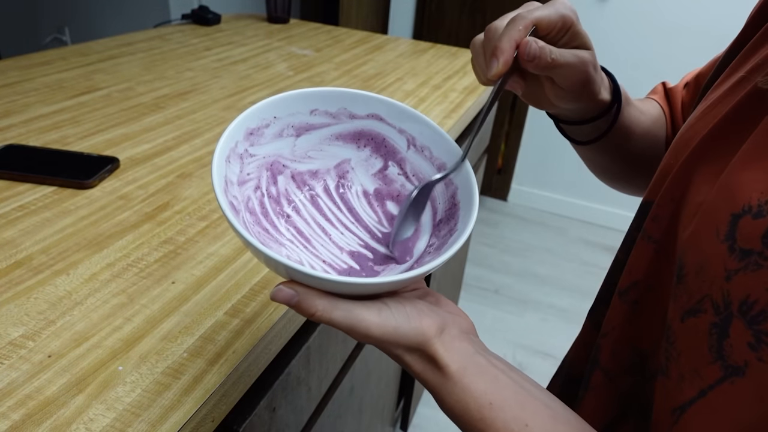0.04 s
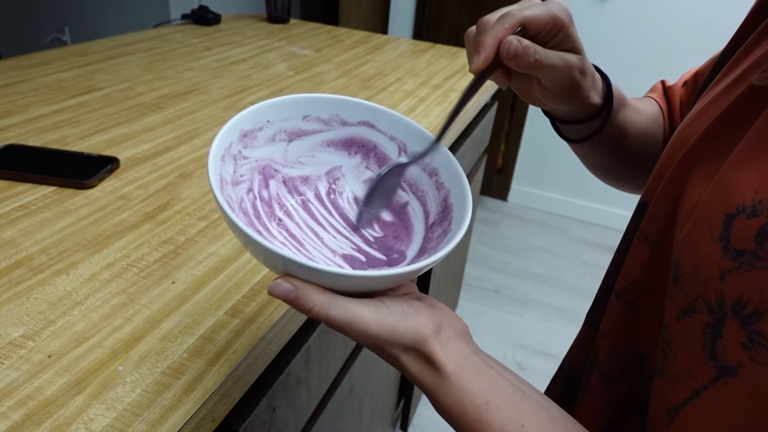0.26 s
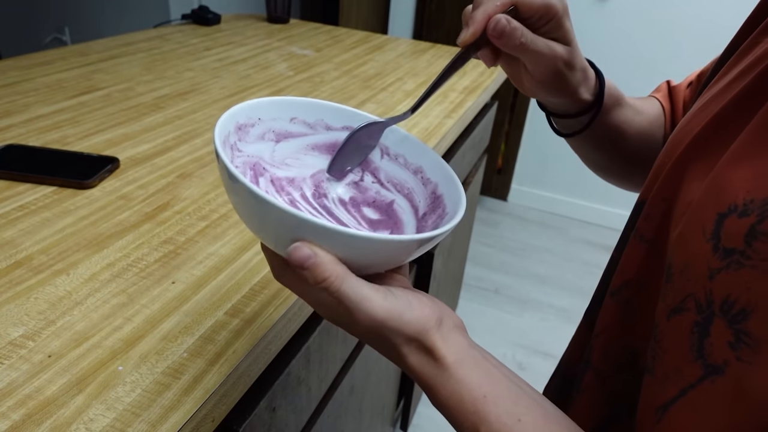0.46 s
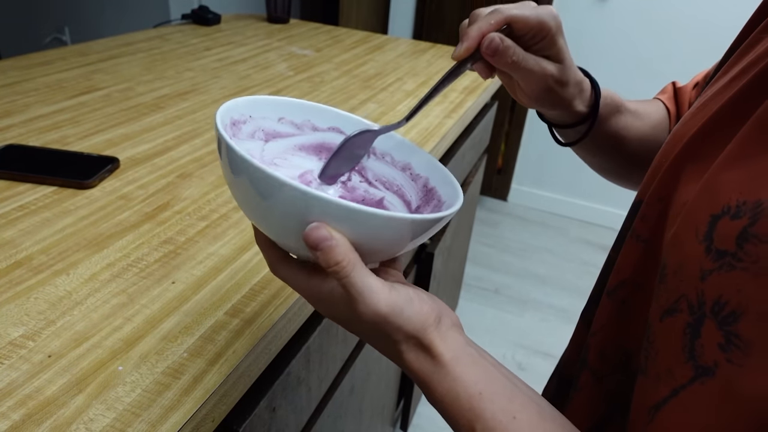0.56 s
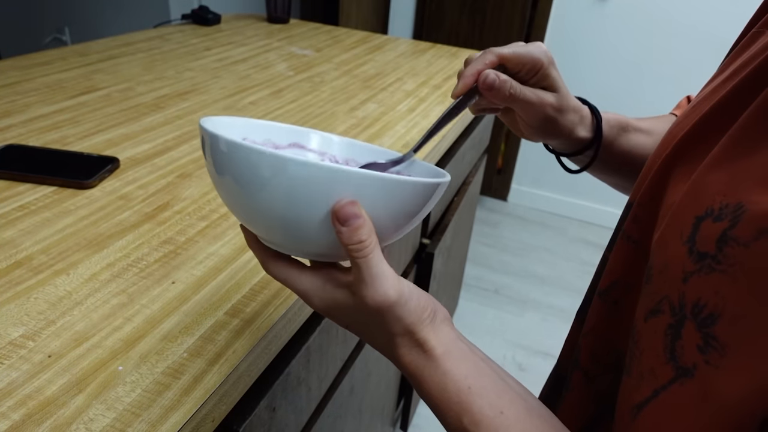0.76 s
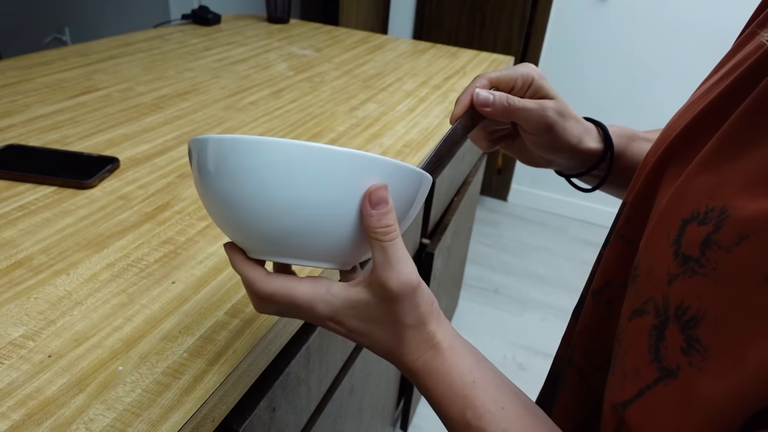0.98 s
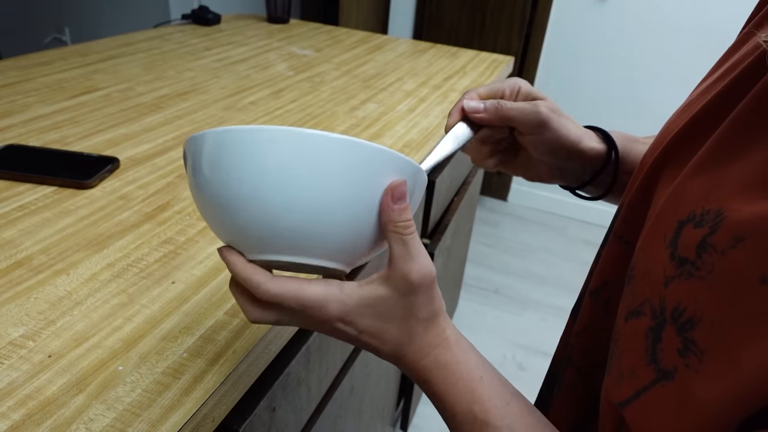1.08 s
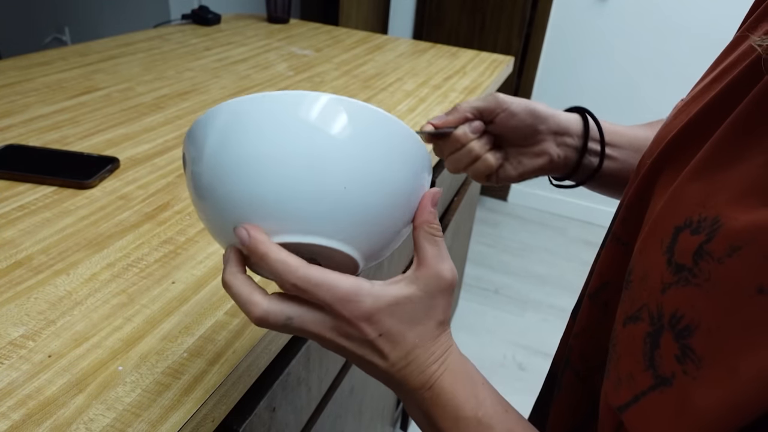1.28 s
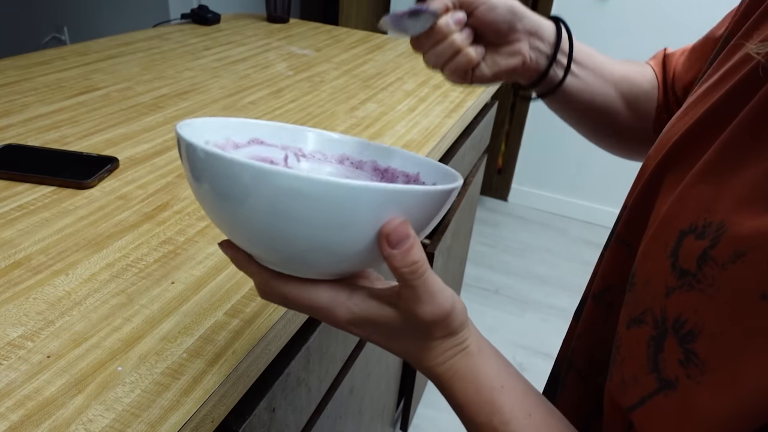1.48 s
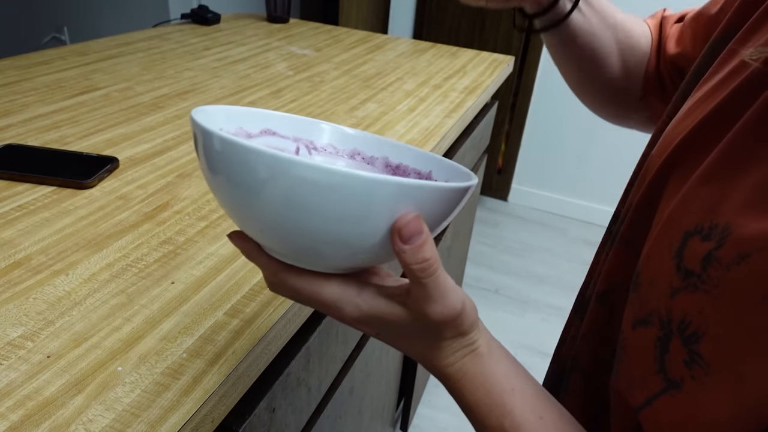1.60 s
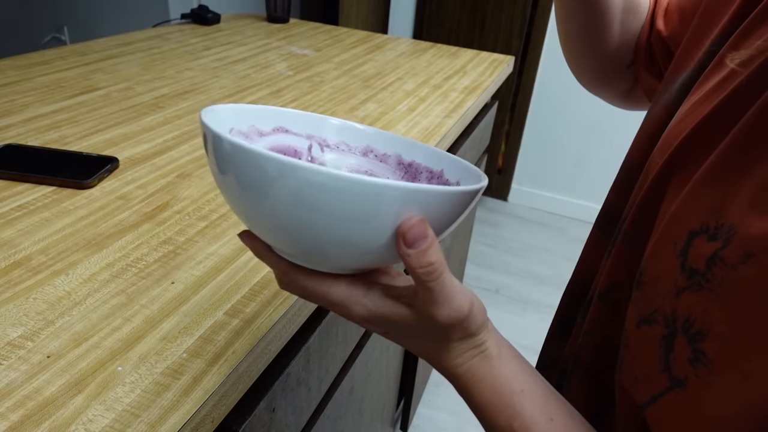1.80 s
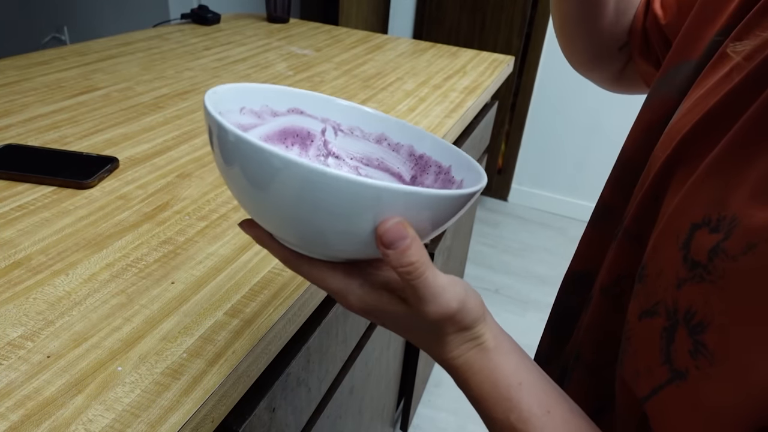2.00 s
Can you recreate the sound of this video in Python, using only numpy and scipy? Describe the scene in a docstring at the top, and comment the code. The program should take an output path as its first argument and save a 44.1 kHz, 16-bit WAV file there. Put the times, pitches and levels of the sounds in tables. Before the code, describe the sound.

A metal spoon scrapes and clinks three times against a hand-held ceramic bowl, ringing briefly. A soft wipe through a creamy film follows, with small wet ticks and a final dry click, heard close in a small, quiet kitchen.

```python
"""In a small, quiet kitchen a metal spoon scrapes a hand-held ceramic bowl and clinks against it three
times, each impact exciting the bowl's normal modes. Stick-slip friction makes the scrapes and squeaks.
A dull knock sounds as the spoon begins a soft wipe along the wall; before and after it the creamy film
snaps in small wet ticks, and a dry click ends the scene. The room reverberates after each clink,
over the faint hum of an appliance."""
import sys
import numpy as np
from scipy import signal
from scipy.fft import rfft, irfft
from scipy.io import wavfile

SR = 44100
rng = np.random.default_rng(int(sys.argv[2]) if len(sys.argv) > 2 else 0)


def pcm_store(signal):
    """Save signal as 16-bit PCM."""
    levels = np.round(np.clip(np.atleast_2d(signal), -1, 1) * 32767)
    wavfile.write(sys.argv[1], SR, levels.astype(np.int16).T)


N = 90404
TIME = np.arange(N) / SR
FREQS = np.fft.rfftfreq(N, 1 / SR)


def clinks():
    """Impact excitation: a crack, a dense clack and free modal vibration, which the spoon later damps."""
    # blows (time [s], clack level [dB], clack t60 [s], clack tilt [dB/octave], time until damped [s])
    blows = [(.2364, -20, 0.048, -0.7, 0.24), (.2996, -26, 0.054, -0.25, 0.18),
             (.5538, -27.5, 0.15, 1, .45)]
    # normal modes of the bowl; the lowest form close pairs that beat (frequency [Hz])
    mode_hz = [980, 986, 2309, 2298, 2936, 3770, 4003, 4024, 5170, 5545, 5594, 6061, 6765, 6793, 7316, 8396,
               8568, 8736, 10190, 10664, 11030, 11720, 12250, 12930, 14850]
    # each contact point excites these modes differently (t60 [s], level in blow 1, 2, 3 [dB])
    mode_response = [(0.83, -58.5, -63.5, -33), (0.19, -18, -50.5, -26.5), (.43, -25, -44.5, -30),
                     (0.11, -25, -63, -25), (.12, -40.5, -61.5, -35.5), (.14, -39, -51.5, -38),
                     (.26, -23, -58.5, -24), (0.17, -30, -48.5, -35), (0.094, -46.5, -32.5, -63.5),
                     (0.21, -35.5, -53.5, -32.5), (0.074, -40, -41.5, -56), (0.15, -22.5, -44.5, -24.5),
                     (.22, -40, -35.5, -52), (0.087, -37.5, -23, -45.5), (.16, -56.5, -57.5, -38.5),
                     (0.12, -20.5, -53, -28.5), (0.22, -36.5, -32, -47.5), (.19, -41.5, -31, -47.5),
                     (.12, -47.5, -42.5, -28), (0.051, -49, -34, -20), (.13, -50.5, -50, -42),
                     (.12, -35, -52, -31.5), (.12, -46, -55, -38), (.13, -48, -53, -48),
                     (.12, -39, -44, -70.5)]
    # spectrum of metal striking glaze (frequency [Hz], relative level [dB])
    clack_spectrum = [(60, -30.5), (250, -11.5), (500, -3), (750, -1.5), (1100, 0), (1550, -6.5),
                      (2300, -8.5), (3100, -11), (4200, 1.5), (5300, -5.5), (6400, 4.5), (7600, -10.5),
                      (8700, -4.5), (9600, -6.5), (12000, -8.5), (13600, -8), (15100, -9.5), (16000, -15)]
    pairs_below_hz, pressed_t60_s = 2500, 0.13
    crack_db, crack_t60_s, rise_s = 11, 0.0089, 0.00027
    peak_width_hz, peak_db = 71, 6  # the clack gathers around the modes
    clack_colour = read(clack_spectrum, FREQS) + resonances([(hz, peak_width_hz, peak_db) for hz in mode_hz])
    out = np.zeros(N)
    for k, (s, clack_db, clack_t60, tilt_db, free_s) in enumerate(blows):
        signs = np.where(np.array(mode_hz) < pairs_below_hz, 1, rng.choice([-1, 1], len(mode_hz)))
        modes = sum(sign * ring(hz, levels[k], t60)
                    for sign, hz, (t60, *levels) in zip(signs, mode_hz, mode_response))
        damping = decay(np.maximum(TIME - free_s, 0), pressed_t60_s)
        envelope = decay(TIME, clack_t60) + amp(crack_db) * decay(TIME, crack_t60_s)
        clack = colour(rng.standard_normal(N) * envelope, clack_colour + tilt_db * np.log2(FREQS + 20))
        add(out, s, modes * rise(rise_s) * damping + amp(clack_db) * clack)
    return out


def scrapes():
    """Forced vibration: hard strokes along the glaze drive the resonances of spoon and bowl."""
    # strokes of the spoon (time [s], duration [s], level [dB])
    strokes = [(0, 0.018, -44), (0.015, 0.075, -45.5), (0.345, 0.051, -49), (0.734, 0.051, -59.5),
               (0.821, 0.053, -67)]
    # friction spectrum of the glaze (frequency [Hz], relative level [dB])
    grit = [(150, -26), (450, -10), (640, -3.5), (820, -13.5), (1200, 0), (1900, -11.5), (4400, -9),
            (5500, -6.5), (9000, -10), (11000, -12.5), (13500, -27.5), (15200, -19.5)]
    # resonances of spoon and bowl in contact (frequency [Hz], bandwidth [Hz], relative level [dB])
    contact = [(640, 130, 8), (974, 30, 11.5), (2305, 28, 13.5), (3923, 70, 16.5), (4400, 130, 8.5),
               (5300, 34, 0.5), (6000, 150, 3.5), (6800, 91, 15.5), (8900, 85, 15), (10120, 210, 11.5),
               (10050, 150, 11), (13000, 74, 15), (14950, 250, 6)]
    edge_s = 0.0075
    pressure = sum(amp(db) * np.clip(np.minimum(TIME - s, s + length - TIME) / edge_s + 0.5, 0, 1)
                   for s, length, db in strokes)
    return friction(pressure, read(grit, FREQS) + resonances(contact))


def wipe():
    """Lubricated friction: the spoon slides softly up the creamy wall."""
    # envelope of the wipe (time [s], level [dB])
    envelope = [(0.878, -69), (1.002, -74.5), (1.08, -69), (1.19, -64.5), (1.24, -57.5), (1.291, -62.5),
                (1.36, -68.5), (1.55, -108)]
    # friction spectrum of the cream (frequency [Hz], relative level [dB])
    cream = [(300, -16.5), (800, 5), (1100, 15), (1600, -9), (2000, -20), (2320, 4), (2900, -15.5),
             (4500, 0), (6000, -4.5), (7800, -10), (9100, -5), (12000, -28), (16000, -26)]
    s, db = np.transpose(envelope)
    pressure = amp(np.interp(TIME, s, db, left=-np.inf, right=-np.inf))
    return friction(pressure, read(cream, FREQS))


def friction(pressure, spectrum_db):
    """Friction noise: thousands of tiny random slips, as strong as the pressure on the spoon."""
    slips_per_s, spread_db = 4500, 2.5
    strengths = rng.standard_normal(N) * amp(-spread_db * rng.standard_normal(N))
    slips = strengths * (rng.random(N) < slips_per_s / SR)
    return colour(unit(slips) * pressure, spectrum_db)


def squeaks():
    """Stick-slip oscillation: the slips lock into a short, unsteady tone."""
    # gliding tones (time [s], duration [s], start frequency [Hz], end frequency [Hz], level [dB])
    glides = [(.024, .024, 6850, 6800, -35), (.040, .036, 3940, 3980, -47), (.044, .04, 8900, 8950, -39),
              (.053, .014, 6830, 6850, -31), (.2982, .016, 6790, 6775, -15), (.836, .018, 3300, 3000, -47),
              (.836, .03, 9250, 9050, -60), (1.095, .095, 4150, 4950, -60)]
    wobble_hz, gain_db = 67.6, -0.05
    out = np.zeros(N)
    for s, length, start_hz, end_hz, db in glides:
        progress = np.minimum(TIME / length, 1)
        hz = start_hz + (end_hz - start_hz) * progress + wobble_hz * drift(span_s=0.002)
        tone = np.sin(2 * np.pi * np.cumsum(hz) / SR)
        add(out, s, amp(db + gain_db) * np.sin(np.pi * progress) * tone)
    return out


def ticks():
    """Film rupture: each sticky film snaps with a damped tone and a burst of band-pass noise."""
    # snapping films (time [s], frequency [Hz], level [dB], t60 [s])
    snaps = [(.4750, 9750, -37.5, 0.0048), (0.4793, 8630, -29.5, 0.0037), (0.4815, 5600, -31, 0.01),
             (0.4835, 3150, -36, 0.0066), (.4847, 13500, -44, .004), (0.517, 11500, -42.5, 0.0022),
             (0.8198, 4260, -42, 0.0056), (1.3245, 2270, -35, 0.003), (1.3259, 1410, -35, 0.0054),
             (1.3282, 3780, -31.5, 0.0023), (1.3305, 2630, -40.5, .005), (1.4, 5100, -22.5, 0.0014),
             (1.4012, 8330, -37, 0.0038), (1.4405, 6700, -49.5, 0.011), (1.4448, 4800, -32, 0.0031),
             (1.4613, 6440, -43, 0.0054), (1.4659, 7500, -58, .004), (1.4786, 3890, -32, 0.0055),
             (1.4806, 7000, -49, 0.0065), (1.493, 6800, -45.5, 0.0044), (1.5469, 4000, -56, 0.014)]
    grit_gain = 0.27
    out = np.zeros(N)
    for s, hz, db, t60 in snaps:
        detuning = (FREQS + 20) / hz - hz / (FREQS + 20)
        grit = colour(rng.standard_normal(N) * decay(TIME, t60), -20 * np.log10(1 + detuning ** 2))
        add(out, s, ring(hz, db, t60) * rise(0.0001) + grit_gain * amp(db) * grit)
    return out


def knock():
    """Heavy damping: the hand absorbs the bowl's vibration, so a light blow sounds dull."""
    # blow on the held bowl (time [s], gain [dB])
    blows = [(.9876, -35)]
    # hand-damped modes (frequency [Hz], relative level [dB], t60 [s])
    modes = [(262, -5.5, 0.048), (794, 4.5, 0.006), (1530, -22, 0.0069), (3220, 10.5, 0.0019),
             (5190, -0.5, 0.0051), (7400, -33, 0.0012)]
    return taps(blows, modes, rise_s=0.00008)


def click():
    """Transient vibration: the spoon's modes die quickly in a short, dry click."""
    # tap of the spoon (time [s], gain [dB])
    blows = [(1.9966, -26)]
    # modes of the click (frequency [Hz], relative level [dB], t60 [s])
    modes = [(710, -12, 0.024), (973, -12, 0.031), (1610, -10, 0.011), (2580, -21, 0.028), (4180, 2, 0.013),
             (4430, -13, 0.0099), (6100, -14.5, .006), (8600, -10, 0.0024), (11850, -15, 0.0037)]
    return taps(blows, modes, rise_s=0.00087)


def taps(blows, modes, rise_s):
    """Modal superposition: each light blow is a sum of damped sinusoids."""
    out = np.zeros(N)
    sound = sum(ring(hz, db, t60) for hz, db, t60 in modes) * rise(rise_s)
    for s, db in blows:
        add(out, s, amp(db) * sound)
    return out


def kitchen(x):
    """Reverberation: early reflections from the counter and a diffuse tail, longest in the midrange."""
    # reverberation time of the kitchen (frequency [Hz], t60 [s])
    reverb_times = [(200, .3), (600, 0.14), (1400, 0.66), (4000, 0.55), (9000, 0.37), (15000, 0.22)]
    tail_db, predelay_s = -10.5, 0.004
    early_db, early_t60_s, echoes_per_s = -15, 0.05, 1500
    hz, t, noise_bands = signal.stft(rng.standard_normal(SR), SR, nperseg=256)
    tail = signal.istft(noise_bands * decay(t, read(reverb_times, hz)[:, None]), SR, nperseg=256)[1][:SR]
    early = rng.standard_normal(SR) * (rng.random(SR) < echoes_per_s / SR) * decay(TIME[:SR], early_t60_s)
    response = amp(tail_db) * tail / np.linalg.norm(tail) + amp(early_db) * early / np.linalg.norm(early)
    out = np.zeros(N)
    add(out, predelay_s, signal.fftconvolve(x, response))
    return out


def background():
    """Ambient noise: a soft broadband floor and an appliance's hum, modulated in amplitude and phase."""
    # spectrum of the room noise (frequency [Hz], relative level [dB])
    floor = [(20, 1.5), (60, -4.5), (95, -14), (200, -1.5), (420, 0), (630, -8.5), (1000, -12), (1600, -20),
             (4000, -21), (8000, -27.5), (15000, -32.5)]
    # partials of the appliance (frequency [Hz], level [dB])
    partials = [(118, -77), (177, -71.5), (221, -70), (357, -80), (770, -73), (1184, -78), (2013, -82)]
    floor_db, waver_depth, waver_s = -63, 0.31, 0.12
    air = unit(irfft(rfft(rng.standard_normal(N)) * amp(read(floor, FREQS)), N))
    hum = np.zeros(N)
    for hz, db in partials:
        waver = 1 + waver_depth * (drift(waver_s) + 1j * drift(waver_s))
        hum += amp(db) * unit((waver * np.exp(2j * np.pi * hz * TIME)).real)
    return amp(floor_db) * air + hum


def ring(hz, db, t60):
    """Damped harmonic oscillation of one mode."""
    return amp(db) * decay(TIME, t60) * np.cos(2 * np.pi * hz * TIME)


def resonances(peaks):
    """Gain in dB of Lorentzian resonances above a flat base."""
    power = sum(amp(db) ** 2 / (1 + (2 * (FREQS - hz) / width) ** 2) for hz, width, db in peaks)
    return 10 * np.log10(1 + power)


def colour(x, db):
    """Minimum-phase filter with the given spectral shape and a mean power gain of one."""
    cepstrum = irfft(np.log(amp(db)), N) * 2 * (np.arange(N) < N // 2)
    cepstrum[0] /= 2
    kernel = irfft(np.exp(rfft(cepstrum)), N)[:4096]
    return signal.fftconvolve(x, kernel / np.linalg.norm(kernel))[:N]


def drift(span_s):
    """Low-pass noise that changes over the given time."""
    return unit(irfft(rfft(rng.standard_normal(N)) * np.exp(-(FREQS * span_s) ** 2), N))


def rise(rise_s):
    """Exponential onset with time constant rise_s."""
    return 1 - np.exp(-TIME / rise_s)


def decay(t, t60):
    """Exponential fall of 60 dB in t60."""
    return amp(-60 * t / np.maximum(t60, 1e-4))


def amp(db):
    """Decibels to amplitude ratio."""
    return 10 ** (np.asarray(db) / 20)


def unit(x):
    """Normalisation to an rms of one."""
    return x / np.sqrt(np.mean(x ** 2) + 1e-20)


def read(points, hz):
    """Interpolation of a table on a log-frequency axis."""
    f, value = np.transpose(points)
    return np.interp(np.log(hz + 1), np.log(f + 1), value)


def add(mix, s, sound):
    """Superposition of a sound on the mix at time s."""
    part = mix[max(round(s * SR), 0):][:len(sound)]
    part += sound[:len(part)]


def scene():
    """Direct sound plus reverberant field; the small ticks and taps send less into the room."""
    main = clinks() + scrapes() + wipe() + squeaks()
    small = ticks() + knock() + click()
    return (main + small + kitchen(main + amp(-4) * small) + background())[None]


def record(dry):
    """Band limiting: a high-pass filter thins the bass and a steep low-pass cuts the highest treble."""
    low_cut_hz, high_cut_hz = 74, 15950
    thin = signal.sosfilt(signal.butter(2, low_cut_hz, "highpass", fs=SR, output="sos"), dry)
    lowpass = signal.firwin(255, high_cut_hz, window=("kaiser", 9), fs=SR)
    return signal.oaconvolve(thin, lowpass[None], "same")


dry = scene()
out = record(dry)
pcm_store(out)
```